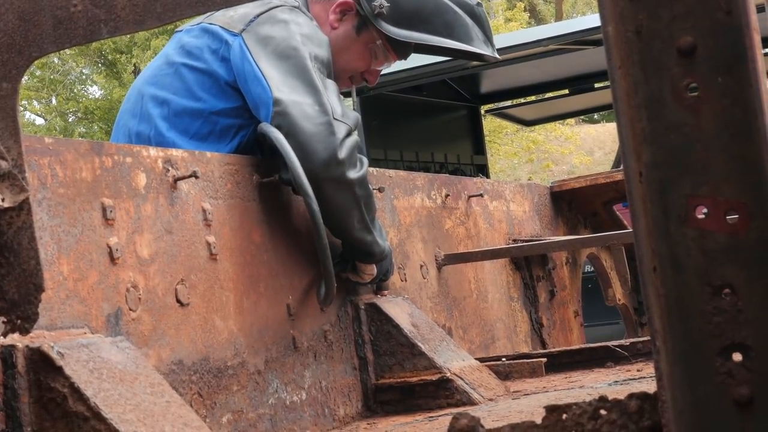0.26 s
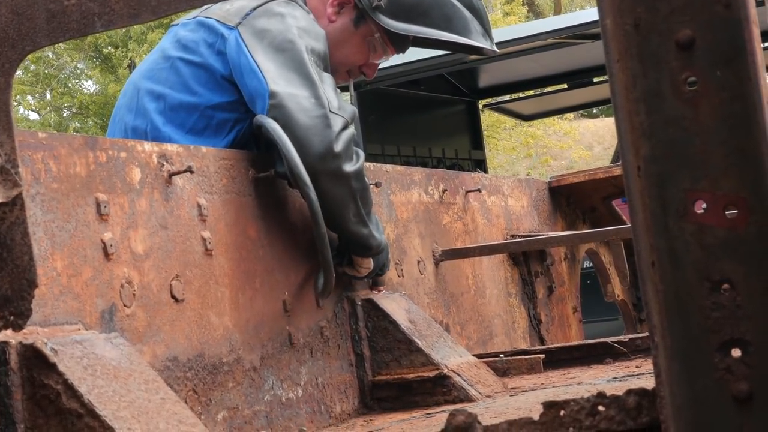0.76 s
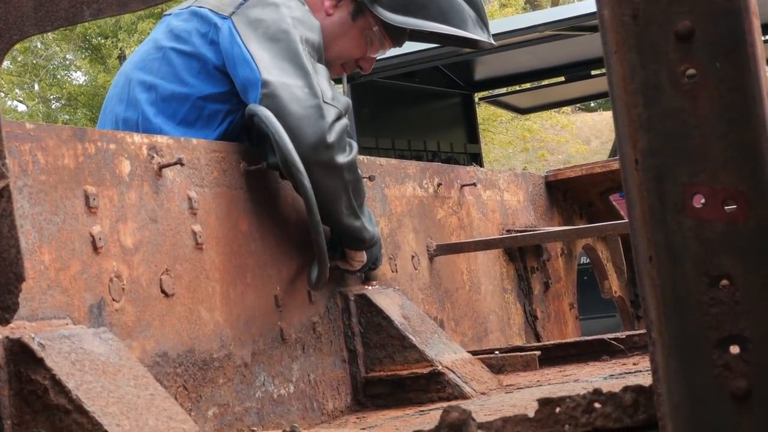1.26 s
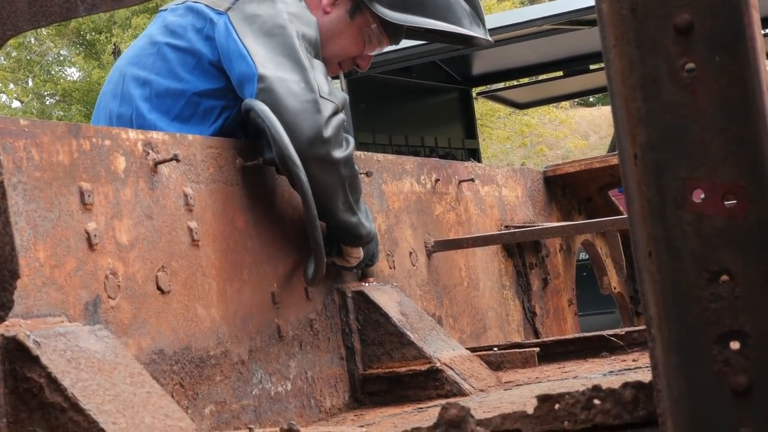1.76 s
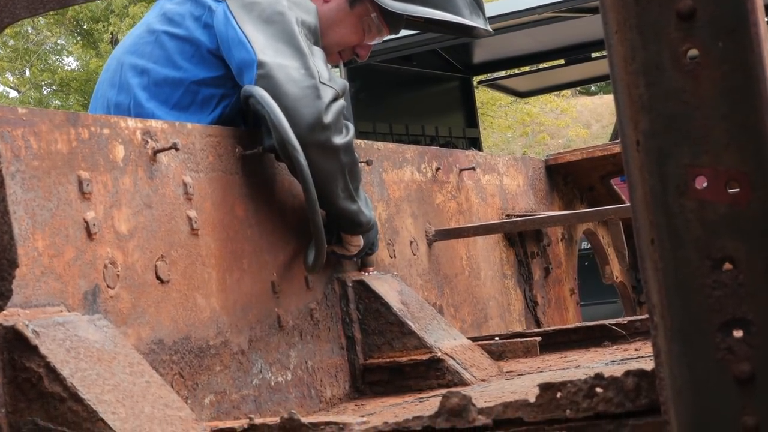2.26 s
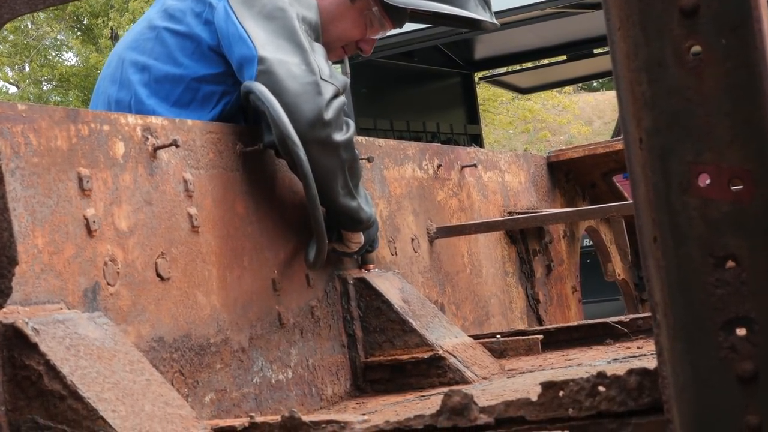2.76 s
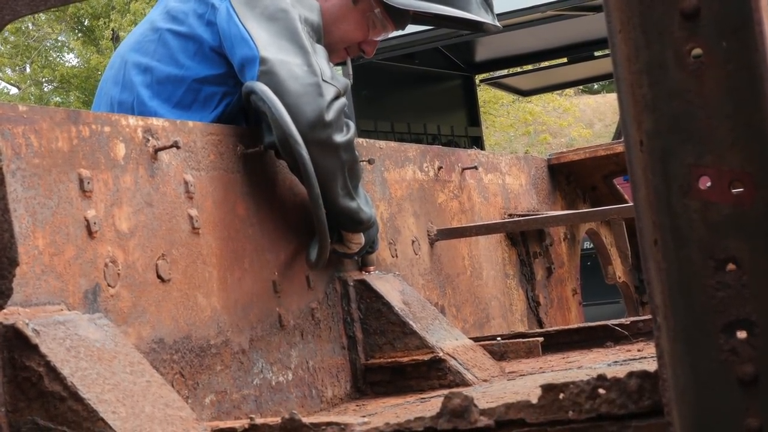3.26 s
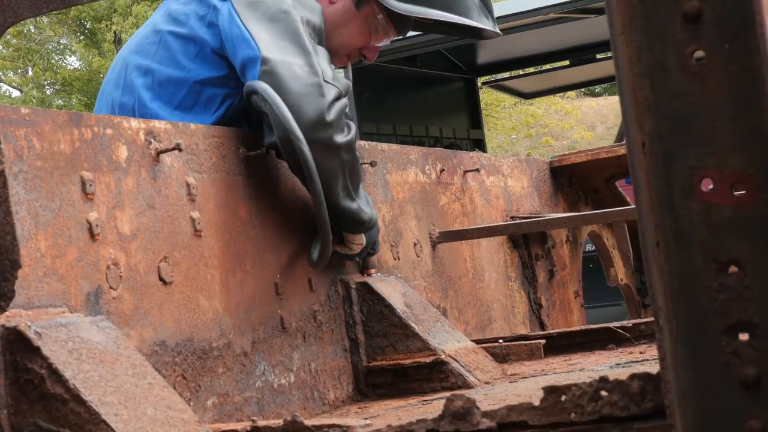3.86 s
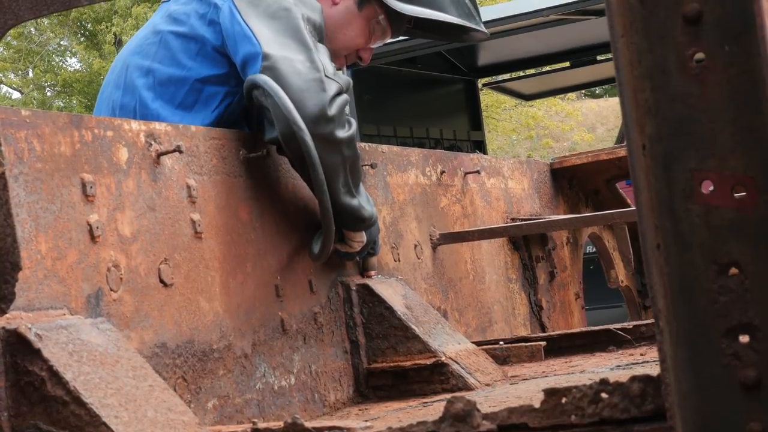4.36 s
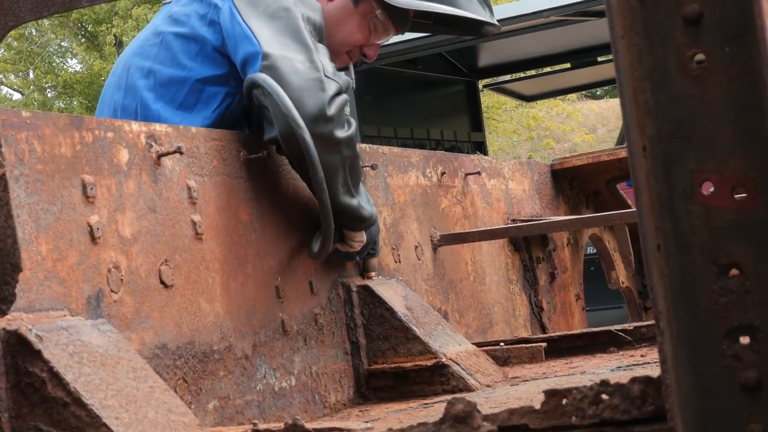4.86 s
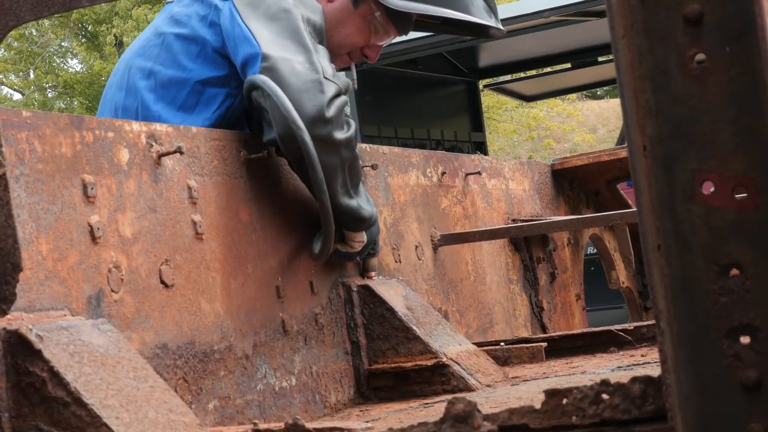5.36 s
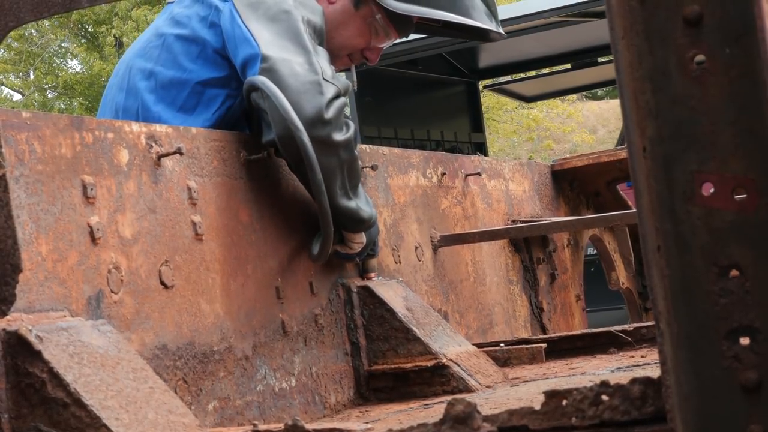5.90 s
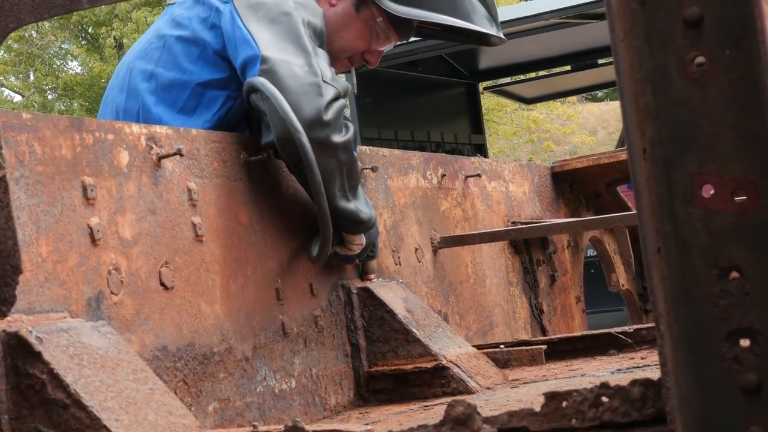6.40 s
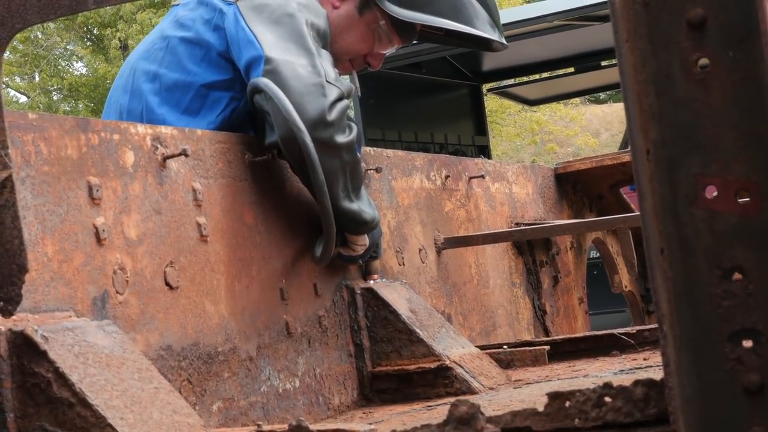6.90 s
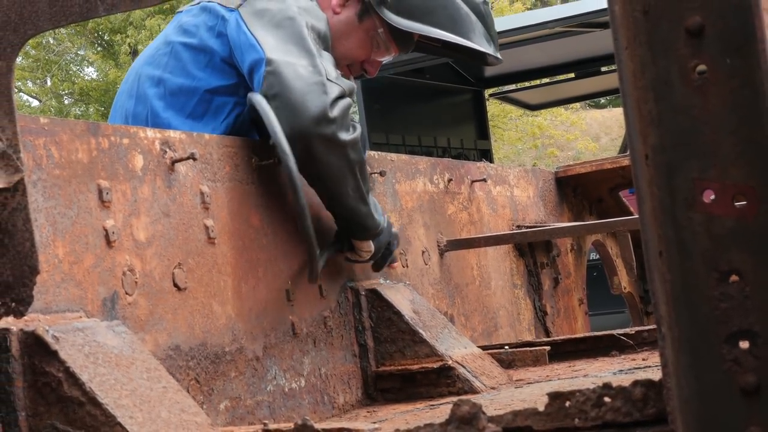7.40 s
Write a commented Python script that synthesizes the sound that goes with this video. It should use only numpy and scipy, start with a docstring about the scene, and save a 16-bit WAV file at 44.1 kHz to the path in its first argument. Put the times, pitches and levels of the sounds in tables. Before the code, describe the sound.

A plasma torch hisses and roars steadily through rusted steel plate over a droning engine, then the arc stops and only air hisses on.

```python
"""A plasma torch cuts rusted plate inside an open steel body, with an engine-driven supply droning nearby.
The air jet hisses first, the arc strikes and the jet roars through the kerf (the slot it cuts);
then the arc stops and the air runs on. Jet sounds are shaped noise, coloured differently on each side.
The engine is a stack of wavering tones plus a throbbing rumble; it sags under the load and picks up again."""
import sys
import numpy as np
from scipy.fft import rfft, irfft
from scipy.io import wavfile

SR = 44100
rng = np.random.default_rng(int(sys.argv[2]) if len(sys.argv) > 2 else 0)


def bounce(signal):
    """Save signal as a 16-bit WAV file at the path given by the first command-line argument."""
    frames = np.transpose(np.atleast_2d(signal))
    limited = np.clip(frames, -1, 1)
    pcm = np.round(limited * 32767).astype(np.int16)
    wavfile.write(sys.argv[1], SR, pcm)


N = 336924
TIME = np.arange(N) / SR   # s
FREQ = np.maximum(np.arange(N // 2 + 1) * SR / N, 1)   # Hz, kept above zero for the logs
ARC_ON_S, ARC_OFF_S = 0.1408, 7.262

# jet breaking on the cut edge: (frequency [Hz], relative level per Hz [dB])
KERF_SPECTRUM = [(400, -14), (900, -5), (1300, -4.5), (1550, -7), (2100, 0.5), (3000, 3), (4500, 2.5),
                 (6000, 2), (7500, 1), (10000, -11), (15000, -4)]


def from_db(db):
    """Turn decibels into gain."""
    return 10 ** (np.asarray(db) / 20)


def rms_one(x):
    """Scale to unit rms."""
    return x / np.sqrt(np.mean(x ** 2) + 1e-20)


def in_time(rows):
    """Read each column of a time table at every sample."""
    seconds, *columns = np.transpose(rows)
    return [np.interp(TIME, seconds, column) for column in columns]


def in_hz(points):
    """Read a spectrum table at every frequency, joined on a log axis."""
    hz, value = np.transpose(points)
    return np.interp(np.log(FREQ), np.log(hz), value)


def drift(rate_hz):
    """Slow random wandering of unit rms: noise with everything much faster than rate_hz removed."""
    lowpass = 1 / (1 + (FREQ / rate_hz) ** 4)
    return rms_one(irfft(rfft(rng.standard_normal(N)) * lowpass, N))


def resonances(modes):
    """Left and right gain of a set of bell-shaped peaks and hollows."""
    sides = np.array([[.5], [-.5]])   # each side takes half the left-right difference
    total_db = 0
    for hz, width, db, left_right_db in modes:
        bell = .5 ** ((2 * (FREQ - hz) / width) ** 2)
        total_db = total_db + (db + sides * left_right_db) * bell
    return from_db(total_db)


def turbulence(spectrum, colour):
    """Stereo flow noise, part direct and alike, part scattered and unlike; its mono mix has unit rms."""
    # how alike the two sides are: (frequency [Hz], left-right correlation [-1 to 1])
    likeness = [(25, 0.57), (70, 0.74), (140, 0.91), (400, 1), (550, 0.76), (800, 0.27), (1150, 0.4),
                (1500, 0.082), (4000, 0.17), (7500, 0.067), (9200, 0.29), (10000, 0.55), (13000, 0.55),
                (15800, 0.31)]
    alike = np.clip(in_hz(likeness), -.999, .999)
    mid, side = rfft(rng.standard_normal((2, N)))
    pair = np.sqrt(1 + alike) * mid + np.sqrt(1 - alike) * side * [[1], [-1]]
    noise = irfft(pair * from_db(in_hz(spectrum)) * colour, N)
    return noise / np.std(noise.mean(axis=0))


def arc_lit(rise_s=0.031, fall_s=0.017):
    """The arc builds quickly (0 to 1) and dies away between the walls when it stops."""
    rise = np.clip((TIME - ARC_ON_S) / rise_s + .5, 0, 1)
    return rise * np.exp(-np.maximum(TIME - ARC_OFF_S, 0) / fall_s)


def torch(arc_trim_db=-2.0, kerf_trim_db=-0.26, sputter_db=1.0, sputter_hz=16.0):
    """Air hisses throughout; the arc heats the jet, which sputters as it blows melt out of the kerf."""
    # the cut, as the jet bites more or less steel, before the two trims:
    # (time [s], hiss of the arc [dB], roar in the kerf [dB])
    cut_levels = [(0.17, -28, -37), (0.21, -26.5, -35), (0.48, -29, -37), (0.9, -26, -36),
                  (1.67, -27.5, -36), (2.53, -26, -33.5), (2.57, -28, -40.5), (2.69, -26, -33),
                  (3.6, -25, -34), (3.78, -27, -36), (4.82, -24.5, -36), (4.88, -23, -36),
                  (5.22, -25.5, -35), (5.71, -25, -35.5), (6.5, -24.5, -32), (7.01, -25.5, -39.5),
                  (7.03, -25, -37.5), (7.25, -25, -34)]
    # free air jet: (frequency [Hz], relative level per Hz [dB])
    air_spectrum = [(900, -22), (1600, -16.5), (2200, -16.5), (3800, -11.5), (5200, -14.5), (6200, -9),
                    (8000, -8.5), (9500, -3.5), (11000, -1.5), (12000, -3), (13100, -3.5), (13800, -12),
                    (15500, -13)]
    # hot jet at the nozzle: (frequency [Hz], relative level per Hz [dB])
    arc_spectrum = [(3000, -23), (6000, -9), (8200, -3.5), (9300, -5), (10000, 1.5), (11500, 1.5),
                    (13000, 0.5), (14300, 0.5), (15800, -7.5)]
    # peaks and hollows between the steel walls:
    # (frequency [Hz], width [Hz], level [dB], left minus right [dB])
    wall_modes = [(1840, 200, 3, -4), (2083, 140, 3, 12.5), (2263, 130, 4.5, -8.5), (2437, 76, 5, 2),
                  (2670, 95, 3, -4.5), (3005, 54, 0.5, -4), (3254, 190, 0.5, -9), (3800, 110, -8.5, -14),
                  (4360, 350, 1.5, -8), (4770, 94, 6.5, 1), (4840, 84, -3.5, -4), (5300, 150, 2, -1),
                  (5374, 78, 6.5, 1), (5456, 160, -4.5, -8.5), (5880, 350, 2.5, -2.5), (6300, 140, -3, 9),
                  (6820, 300, 2.5, -2), (9580, 220, 2.5, 1), (9900, 300, 2, 1), (10900, 150, -3.5, 6),
                  (12900, 300, 0, 1)]
    air_db, air_rise_s = -29.5, 0.096
    air_lift_db = -1.5   # drop once the torch leaves the plate

    walls = resonances(wall_modes)
    hiss_db, roar_db = in_time(cut_levels)
    lit = arc_lit()

    flow = 1 - np.exp(-TIME / air_rise_s)
    lifted = (TIME > ARC_OFF_S) * (1 - lit)
    air_gain = flow * from_db(air_db + air_lift_db * lifted)
    air = air_gain * turbulence(air_spectrum, walls)

    hiss = from_db(hiss_db + arc_trim_db) * turbulence(arc_spectrum, walls)
    sputter = sputter_db * drift(sputter_hz)
    roar = from_db(roar_db + kerf_trim_db + sputter) * turbulence(KERF_SPECTRUM, walls)
    return air + lit * (hiss + roar)


def restless(x, patchy_db=0.84, patchy_hz=12.0, bands=7):
    """Eddies of each size come and go on their own, so neighbouring bands swell separately."""
    place = np.interp(np.log(FREQ), np.log([1800, 14000]), [0, bands - 1])
    spectrum = rfft(x)
    out = 0
    for k in range(bands):
        share = np.maximum(1 - abs(place - k), 0)   # overlapping triangles that add up to one
        swell = from_db(patchy_db * drift(patchy_hz))
        out = out + irfft(spectrum * share, N) * swell
    return out


def noise_swells():
    """Narrow bands of noise that each swell and fade within the torch's hiss."""
    # (time of the peak [s], length [s], frequency [Hz], width [Hz], level at the peak [dB])
    swell_events = [(0.196, 0.073, 1840, 330, -37), (.33, .2, 2130, 400, -45), (.8, 0.83, 10000, 300, -39),
                    (3.55, 0.36, 11900, 500, -36), (6.35, 0.81, 2600, 500, -47),
                    (7.13, .28, 11700, 600, -32)]
    out = 0
    for peak_s, length_s, hz, width, db in swell_events:
        band = 1 / (1 + (2 * (FREQ - hz) / width) ** 2)
        swell = .5 ** ((2 * (TIME - peak_s) / length_s) ** 2)
        out = out + from_db(db) * swell * turbulence(KERF_SPECTRUM, band)
    return out


def near_echoes(x, patterns=8, echo_db=-8.5, first_s=0.0014, decay_s=0.0072):
    """Steel faces close to the torch echo the hiss; the pattern shifts as the hand moves on."""
    place = np.linspace(0, patterns - 1, N)
    tail = (TIME > first_s) * np.exp(-np.minimum(TIME / decay_s, 20))
    spectrum = rfft(x)
    echoes = 0
    for k in range(patterns):
        taps = rng.standard_normal(N) * tail
        taps = taps / np.linalg.norm(taps)
        nearness = np.cos(np.pi / 2 * np.minimum(abs(place - k), 1))   # fade from pattern to pattern
        echoes = echoes + nearness * irfft(spectrum * rfft(taps), N)
    return x + from_db(echo_db) * echoes


def engine_load(sag_s=0.1688, recover_s=0.132):
    """Share of the arc's load felt by the shaft, 0-1: the flywheel takes it up and sheds it gradually."""
    taken_up = 1 - np.exp(-np.maximum(TIME - ARC_ON_S, 0) / sag_s)
    return taken_up * np.exp(-np.maximum(TIME - ARC_OFF_S, 0) / recover_s)


def tone(turns, level_db, waver):
    """A rotating part's sine tone; waver is the share that wanders in strength and phase."""
    unsteady = 1 + waver * (drift(5.4) + 1j * drift(3.8))
    spin = np.exp(2j * np.pi * (turns + rng.random()))
    return np.sqrt(2) * from_db(level_db) * np.real(unsteady * spin)


def engine(firing_waver=0.022, order_waver=0.09, fan_waver=.17, rumble_db=-36.5,
           rumble_follow=0.85, throb=0.077):
    """Firing tones, fan blades and housing noise all follow one shaft."""
    # exhaust and block, three firings a cycle, before the exhaust level:
    # (multiple of the cycle rate, rms level [dB])
    firing_orders = [(3, -31.5), (5, -52), (6, -39.5), (8, -54), (9, -59), (11, -48.5), (12, -47),
                     (18, -52.5), (19, -57.5), (24, -67), (28, -48), (29, -61.5), (30, -58), (34, -59.5),
                     (45, -61)]
    # belt-driven cooling fan, before the exhaust level: (multiple of the blade rate, rms level [dB])
    fan_orders = [(1, -36.5), (2, -62), (3, -56.5)]
    # broad noise of the running engine: (frequency [Hz], relative level per Hz [dB])
    rumble_spectrum = [(22, -31), (38, -20), (50, -4), (110, 4.5), (200, 0.5), (320, 3), (415, 0.5),
                       (465, -3.5), (690, -2), (880, -0.5), (1220, -2.5), (1450, -9), (3000, -18),
                       (9000, -17.5)]
    # resonances of the engine housing: (frequency [Hz], width [Hz], level [dB], left minus right [dB])
    housing_modes = [(148.3, 11, 11, -4), (242, 25.2, 9.5, 1), (265, 17, 8.5, -0.5), (294, 24, 2, -2),
                     (396, 39, 4.5, 12)]
    free_speed, loaded_speed = 31.02, 30.46   # working cycles per s
    blades_per_cycle = 12.81
    start_db, load_db, fade_db_per_s = 3.7, -2.5, -0.2357   # exhaust level: start, load change, slow fade

    load = engine_load()
    speed = free_speed + (loaded_speed - free_speed) * load
    cycles = np.cumsum(speed) / SR
    exhaust_db = start_db + load_db * load + fade_db_per_s * TIME

    (firing, firing_db), *overtones = firing_orders
    firing_tone = tone(firing * cycles, firing_db + exhaust_db, firing_waver)
    body = sum(tone(k * cycles, db, order_waver) for k, db in overtones)
    fan = sum(tone(k * blades_per_cycle * cycles, db, fan_waver) for k, db in fan_orders)

    puffs = 1 + throb * np.cos(2 * np.pi * firing * cycles)   # gas leaves in a puff at each firing
    rumble = from_db(rumble_db) * puffs * turbulence(rumble_spectrum, resonances(housing_modes))
    # all but the firing tone follow the exhaust level only in part
    return firing_tone + (body + fan + rumble) * from_db(rumble_follow * exhaust_db)


def scene():
    """Torch and engine heard together; only the torch gets the near echoes."""
    cutting = restless(torch()) + noise_swells()
    return near_echoes(cutting) + engine()


def record(dry):
    """The microphone ports swallow one narrow band, and the top is cut steeply."""
    # hollow of the ports: (frequency [Hz], width [Hz], level [dB], left minus right [dB])
    port_notch = [(7890, 95, -19, 0)]
    cutoff_hz = 15480
    top = 1 / np.sqrt(1 + (FREQ / cutoff_hz) ** 400)
    return irfft(rfft(dry) * resonances(port_notch) * top, N)


dry = scene()
out = record(dry)
bounce(out)
```